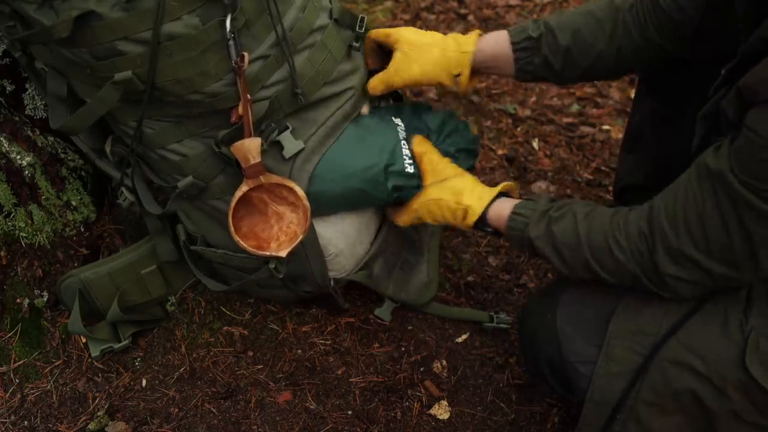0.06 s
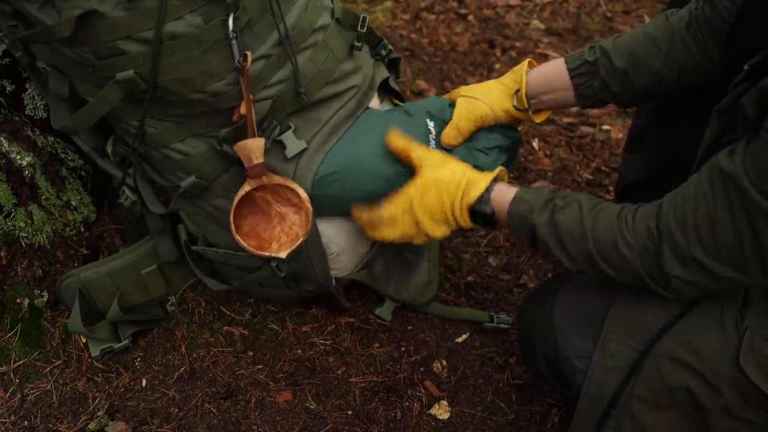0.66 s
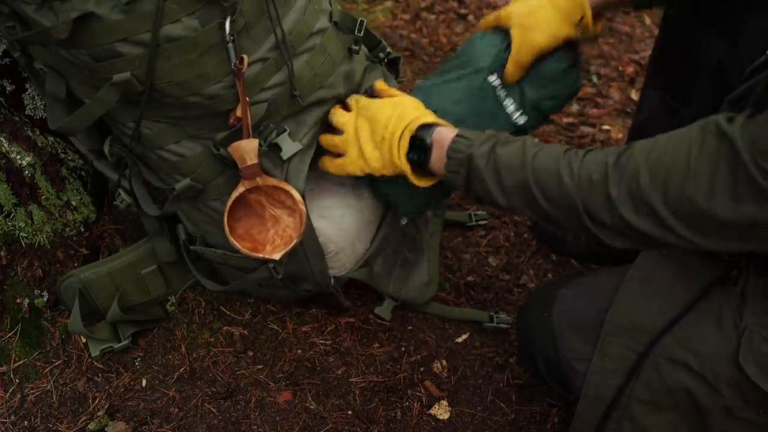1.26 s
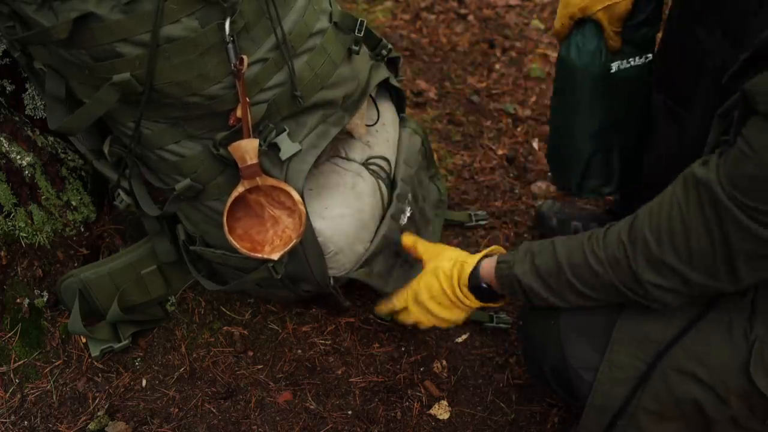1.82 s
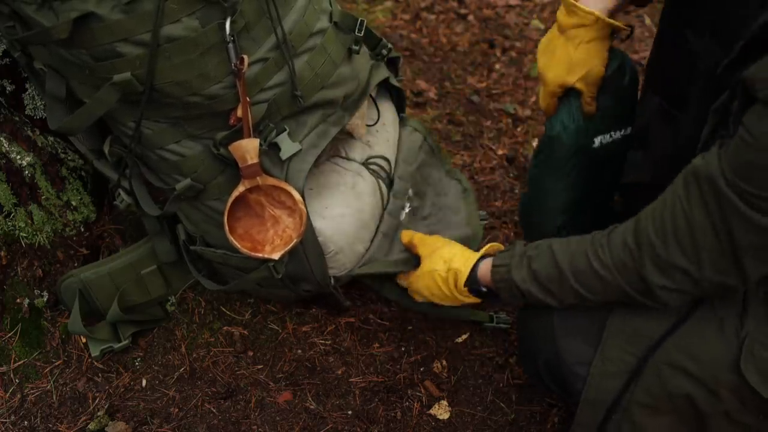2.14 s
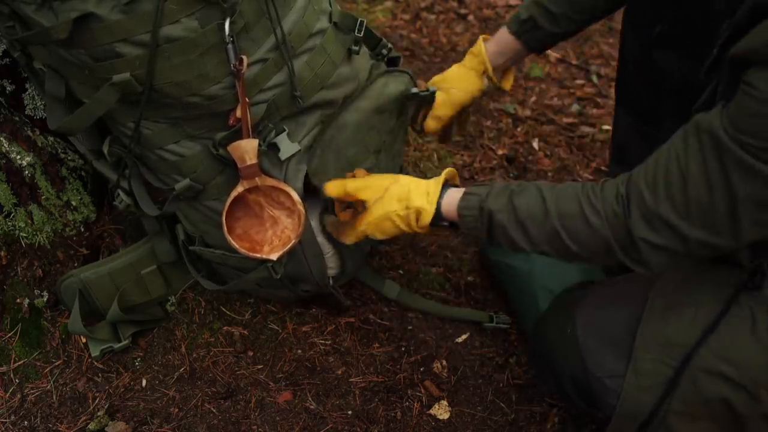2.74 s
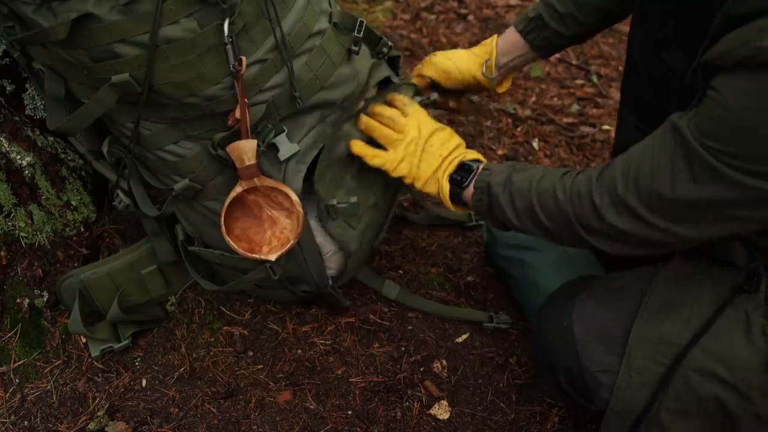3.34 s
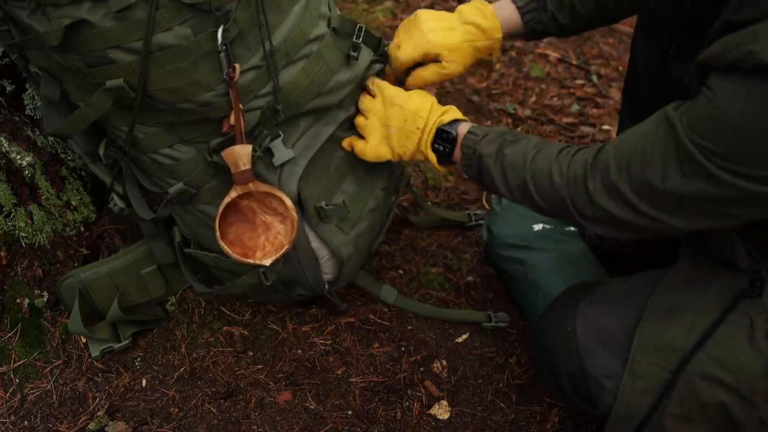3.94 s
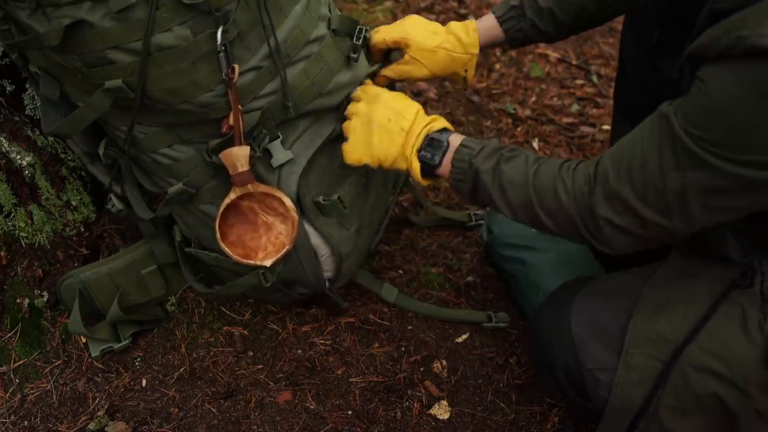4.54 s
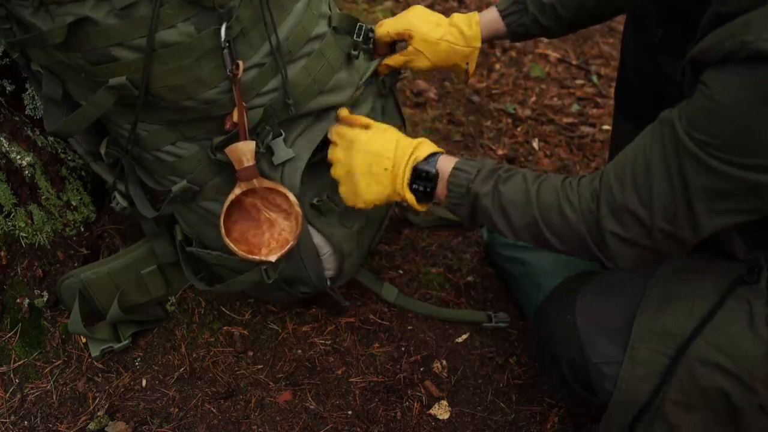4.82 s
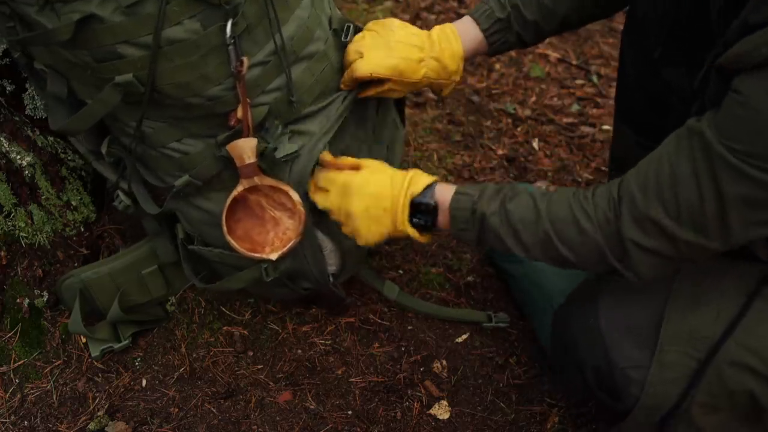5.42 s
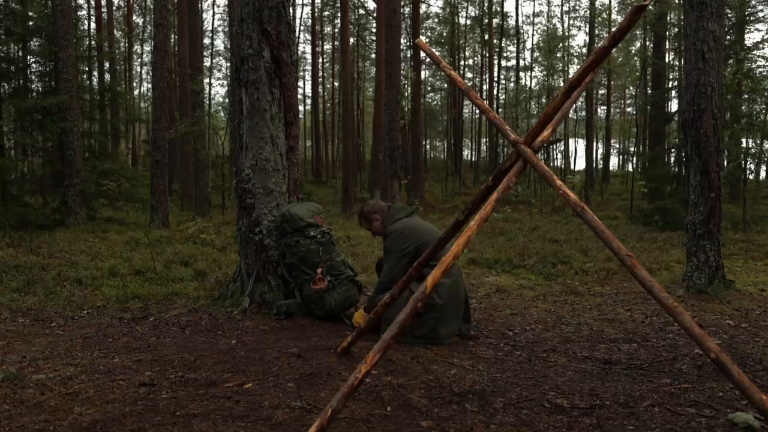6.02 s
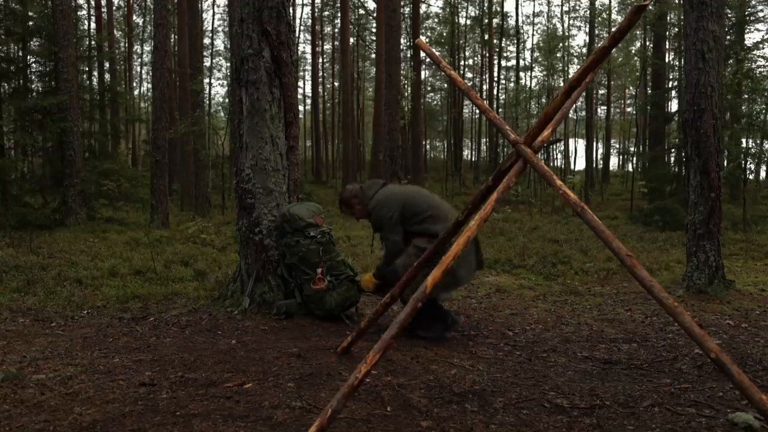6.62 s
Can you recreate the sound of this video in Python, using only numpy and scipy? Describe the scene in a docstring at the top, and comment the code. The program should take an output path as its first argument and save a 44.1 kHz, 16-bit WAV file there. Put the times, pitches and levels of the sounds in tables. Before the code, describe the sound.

Close nylon rustling and a soft thud, followed by a backpack zip ticking and buzzing in short pulls in a quiet forest.

```python
"""On a quiet forest floor, a nylon stuff sack rustles against a backpack and is dropped beside it.
Sliding cloth gives friction noise, folds snap over, and a glove squeaks by stick and slip.
Gloved hands fold the flap over and draw it shut in jerks: the fastener, most likely a coarse zip,
ticks tooth by tooth, then buzzes as it speeds up, and every tooth thumps the taut fabric."""
import sys
import numpy as np
from scipy import signal
from scipy.fft import rfft, irfft, next_fast_len
from scipy.io import wavfile
from scipy.ndimage import uniform_filter1d

SR = 44100
rng = np.random.default_rng(int(sys.argv[2]) if len(sys.argv) > 2 else 0)


def transcribe(signal):
    """Save signal, clipped to [-1, 1], as a 16-bit WAV file at the path in sys.argv[1]."""
    frames = np.atleast_2d(signal).T
    limited = np.clip(frames, -1, 1)
    pcm = np.round(limited * 32767).astype(np.int16)
    wavfile.write(sys.argv[1], SR, pcm)


N = 293511
T = np.arange(N) / SR

# Noise spectra. Each row: frequency in Hz, relative spectral density in dB.
FOREST_SPECTRUM = [(15, -19), (25, 10), (156, -6), (260, -1.5), (340, -6), (848, -6), (1240, -14),
                   (2920, -16), (3720, -21), (15500, -21)]
CLOTH_SPECTRUM = [(29, -43), (50, -4.5), (122, 2.5), (183, 3.5), (221, 4.5), (375, 2), (753, 0),
                  (1660, -9.5), (3030, -14), (3670, -21.5), (4670, -21), (6230, -27), (8710, -25.5),
                  (12800, -27.5), (15500, -29)]
CRUMPLE_SPECTRUM = [(24, -34), (40, -27), (263, 3), (359, -5), (479, 2), (816, -8), (1520, -6.5),
                    (2260, -18), (2950, -22), (4210, -31), (8000, -33), (10400, -48), (17600, -120)]   # the sack landing
TAPE_SPECTRUM = [(2060, -29), (3500, 0), (3680, -27), (4040, -10), (5650, 4), (6250, -7), (9130, -5.5),
                 (15500, -6.5)]   # zip tape running through the slider
# Stereo width of the forest. Each row: frequency in Hz, side relative to mid in dB.
FOREST_WIDTH = [(60, -10), (110, -1), (200, -6.5), (380, -3), (700, -8), (1290, -8.5), (2380, -9),
                (4400, -6), (8120, -7), (15000, -3)]

# Resonances. Each row: frequency in Hz, bandwidth in Hz, relative gain in dB.
LOAD_MODES = [(83, 57, -9)]   # the packed contents
SEAM_MODES = [(402, 140, 8), (611, 105, 11), (779, 79, 7), (1036, 50, 3.5)]
SLIDER_MODES = [(1390, 580, 5), (1866, 830, 2.5), (2840, 360, -4), (4350, 980, -14), (5350, 370, -10.5),
                (8630, 1850, -17.5)]
FLAP_EDGE_MODES = [(970, 200, 3.4)]
PULL_TAB_MODES = [(2510, 530, 1.7)]
SQUEAK_MODES = [(603, 98, -1), (930, 120, -3.5)]
THUD_MODES = [(87, 62, -4.5), (250, 140, -9), (480, 140, -8.5)]

# Cloth sliding on cloth, first the sack, then flap and sleeves. Each row: start in seconds,
# length in seconds, level in dB, swell from start to end in dB, brightness in dB.
STROKES = [(-0.02, .19, -44, 1, 1), (0.196, .06, -48.5, 4, -1), (0.256, 0.051, -37.5, 2, -2.5),
           (0.342, .12, -40.5, 2, -2), (0.501, 0.27, -42.5, 4, 0.5), (0.804, 0.15, -45.5, 5, 0.5),
           (0.963, 0.11, -45.5, 5, -1), (1.055, 0.1, -43.5, -3, 4), (1.162, .128, -44.5, 5, 5.5),
           (1.317, 0.29, -52, -2, 2.5), (1.737, 0.4, -55, 1, 0), (1.997, 0.33, -51.5, -1, 4.5),
           (2.318, 0.23, -44.5, 9.5, 5.5), (2.561, 0.15, -48, -2.5, 2), (2.71, 0.27, -55, -1, -2),
           (3.642, 0.25, -48, -5.5, -1), (3.96, 0.17, -54.5, -5, 0.5), (4.134, .06, -45, -3, -4),
           (4.252, 0.1, -48.5, 0.5, -1.5), (5.006, 0.088, -45.5, -4, 0.5), (5.16, 0.19, -44.5, -6, -3),
           (5.787, 0.18, -48.5, -2.5, -3), (6.099, 0.25, -52.5, -4, -27)]
# Folds snapping and gloves patting, and at 5.85 s the zip's last tooth snapping home. Each row: start in
# seconds, relative thump and click levels in dB.
FOLDS = [(0.083, -38, -36), (0.0935, -45, -26), (0.1666, -34.5, -26.5), (0.2925, -33, -25.5),
         (0.3155, -54, -26), (0.4458, -25.5, -20.5), (0.5388, -41, -30), (0.9374, -39, -32),
         (1.0744, -35.5, -30), (1.282, -38, -23), (1.5326, -49, -34), (2.1584, -31.5, -42),
         (2.3145, -42, -31.5), (2.345, -32.5, -50), (2.4396, -59, -17.5), (2.5022, -36, -29),
         (3.9822, -42, -55), (4.3094, -34.5, -36), (5.1792, -30.5, -23), (5.2827, -36, -53),
         (5.8524, -30, -21.5), (6.316, -41.5, -54), (6.3615, -42, -60)]
# A glove slipping on nylon. Each row: start in seconds, peak level in dB.
GLOVE_SLIPS = [(0.7955, -23.5), (0.8012, -19.5), (0.8042, -29)]
# Single teeth passing the slider.
# Each row: start in seconds, relative thump and click levels in dB, fabric pitch in Hz.
SINGLE_TEETH = [(3.259, -31.5, -33, 180), (3.2848, -30.5, -30.5, 194), (3.3027, -31, -27, 189),
                (3.3228, -27, -33, 177), (4.4221, -34, -30.5, 242), (4.461, -30, -28.5, 262),
                (4.4763, -28.5, -33, 257), (4.5004, -31.5, -25.5, 250), (4.5303, -30.5, -21, 290),
                (4.5442, -28, -18.5, 322), (4.7083, -28, -28, 213), (4.764, -32, -17.5, 230),
                (4.795, -31, -12, 234), (4.8463, -36, -24.5, 142), (4.9444, -33.5, -27, 240),
                (4.9616, -25, -19.5, 223), (5.4958, -27, -26, 182), (5.6086, -33, -25, 154),
                (5.6252, -26, -25, 151), (5.6906, -21, -20, 192), (5.7166, -21.5, -18.5, 191),
                (5.7334, -23, -23, 148), (5.7393, -17.5, -19, 222), (5.758, -36, -21, 180),
                (5.7714, -31, -23, 230), (5.7912, -35, -26, 183)]
# The first long draw of the slider. Each row: time in seconds, teeth per second, roughness from 0 to 1,
# hand force in dB, fabric tension in dB, bite of the hard parts in dB.
LONG_DRAW = [(3.341, 79, .25, -27.5, 1, -10), (3.40, 125, .3, -31, 5, -6),
             (3.452, 215, 0.26, -30, 3.5, -10), (3.48, 237, 0.27, -32.5, 3, -8.5),
             (3.497, 300, 0.01, -33.5, 3, -4), (3.517, 212, 0.05, -31, 1.5, -8),
             (3.55, 222, .05, -28, -0.5, -11), (3.587, 278, .05, -32, 3, -1.5),
             (3.626, 170, .12, -35.5, 7, -0.5), (3.675, 145, .5, -35, 1.5, -1.5),
             (3.711, 88, 0.53, -47, 13, -7)]
# The opposite teeth strike halfway between, strongly near the end of the draw.
# Each row: time in seconds, strength from 0 to 1.
OPPOSITE_ROW = [(3.57, .05), (3.595, 0.96), (3.625, 0.73), (3.71, 0.05)]
# Short jerks. Each row: start, rise, steady and fall times in seconds, nominal top speed in teeth
# per second, roughness from 0 to 1, then force, tension, tightening and bite in dB.
JERKS = [(4.55, 0.042, 0.037, 0.055, 245, 0.3, -31.5, 7, -1, -1),
         (4.723, 0.042, .025, 0.047, 239, 0.3, -35.5, 9.5, -5.5, 4),
         (5.362, .031, .038, .043, 497, 0.11, -32.5, 9.5, 11, 0),
         (5.521, .022, .02, 0.037, 210, .08, -34, 14, -5, 1.5),
         (5.635, 0.016, 0.016, 0.016, 153, 0.25, -32, 15.5, 5, 3)]

CRINKLE_DB, SWISH_DB = -6, -13.5   # against the body of the rustle
SLAP_HARDNESS = 0.55   # 0: the seam's slap follows the thump of a contact, 1: its click
CRUISE_PER_S = 236   # reference speed of the zip, in teeth per second


def from_db(db):
    """Decibels to amplitude ratio."""
    return 10 ** (np.asarray(db) / 20)


def rms_one(x):
    """Normalise to unit rms."""
    return x / np.sqrt(np.mean(x ** 2) + 1e-20)


def in_time(rows):
    """Linear interpolation of each column at every sample."""
    times, *columns = np.transpose(rows)
    return [np.interp(T, times, column) for column in columns]


def cut(x, hz, kind, order=2):
    """Butterworth filter."""
    return signal.sosfilt(signal.butter(order, hz, kind, fs=SR, output="sos"), x + 1e-18)


def colour(x, spectrum):
    """Spectral shaping by a curve interpolated in log frequency."""
    size = next_fast_len(N)
    bins_hz = np.arange(size // 2 + 1) * SR / size
    hz, db = np.transpose(spectrum)
    gain = from_db(np.interp(np.log(np.maximum(bins_hz, 1)), np.log(hz), db))
    return irfft(rfft(x, size) * gain, size)[:N]


def drift(rate_hz):
    """Low-passed noise: a slow random fluctuation of unit rms."""
    step, settling = 40, 2000
    pole = np.exp(-2 * np.pi * step * rate_hz / SR)
    noise = rng.standard_normal(N // step + settling + 2)
    slow = signal.lfilter([1], [1, -2 * pole, pole * pole], noise)[settling:]
    return np.interp(np.arange(N) / step, np.arange(len(slow)), rms_one(slow))


def resonate(x, modes):
    """Superposition of damped modes of alternating sign."""
    out = 0
    for k, (hz, width_hz, db) in enumerate(modes):
        r = np.exp(-np.pi * width_hz / SR)
        feedback = [1, -2 * r * np.cos(2 * np.pi * hz / SR), r * r]
        ring = signal.lfilter([(1 - r * r) / 2, 0, (r * r - 1) / 2], feedback, x + 1e-18)
        out = out + (-1) ** k * from_db(db) * ring
    return out


def grains(per_s, spread_db):
    """Shot noise: impulses at random times, unit rms."""
    sizes = from_db(spread_db * np.minimum(rng.exponential(1, N), 4)) * rng.choice([-1, 1], N)
    return rms_one(sizes * (rng.random(N) < per_s / SR))


def strike(body, start_s, peak_db, scuff, scuff_s):
    """Impact excitation: an impulse and a short scuff of noise set a body ringing."""
    t = T[:4096]
    push = scuff * rng.standard_normal(len(t)) * np.exp(-t / scuff_s) + (t == 0)
    blow = body(push)
    return int(start_s * SR), from_db(peak_db) * blow / np.abs(blow).max()


def place(blows):
    """Superposition of blows, each a start sample and a wave."""
    out = np.zeros(N)
    for start, wave in blows:
        out[start:start + len(wave)] += wave[:N - start]
    return out


def forest(mid_db):
    """Air in the trees is steady broadband noise; an uncorrelated side signal gives it width."""
    mid, side = [rms_one(colour(rng.standard_normal(N), FOREST_SPECTRUM)) for _ in range(2)]
    return from_db(mid_db) * (mid + colour(side, FOREST_WIDTH) * np.array([[1], [-1]]))


def stroke_levels(attack_s, release_s, sleeves_db):
    """Incoherent sources add in power: the cloth's body, crinkle and swish, in dB, over all strokes."""
    body = crinkle = swish = from_db(sleeves_db) ** 2   # the arms never quite rest
    for start_s, length_s, db, swell_db, bright_db in STROKES:
        age = T - start_s
        shape = np.clip(age / attack_s, 0, 1) * np.exp(-np.clip((age - length_s) / release_s, 0, 20))
        progress = np.clip(age / length_s, 0, 1)
        power = (shape * from_db(db + swell_db * (progress - .5))) ** 2
        body = body + power
        crinkle = crinkle + power * from_db(bright_db) ** 2
        swish = swish + power * from_db(1.18 * bright_db) ** 2
    return 10 * np.log10(body), 10 * np.log10(crinkle) + CRINKLE_DB, 10 * np.log10(swish) + SWISH_DB


def rustle(levels_db, flicker_db, clump_db, grain_share):
    """Sliding friction: noise and crease grains, in clumps that differ from band to band."""
    clumps, out = drift(45), 0
    zones_hz = [[60, 250, 500, 1000], [1000, 2000, 4000], [4000, 8000, 16000]]
    for level_db, edges, unevenness in zip(levels_db, zones_hz, [1.0, .9, .4]):
        zone = 0
        for low, high in zip(edges, edges[1:]):
            rub = np.sqrt(1 - grain_share) * rng.standard_normal(N)
            rub += np.sqrt(grain_share) * grains(per_s=2500, spread_db=0.5)
            patches = from_db(unevenness * (flicker_db * drift(14.4) + clump_db * clumps))
            zone = zone + cut(colour(rub, CLOTH_SPECTRUM), [low, high], "band", order=3) * patches
        out = out + from_db(level_db) * rms_one(zone)
    return out


def creases(crinkle_db, per_s, relative_db):
    """Sparse shot noise: single creases pop out of the rustle."""
    pops = cut(colour(grains(per_s, spread_db=2), CLOTH_SPECTRUM), 900, "high")
    return from_db(crinkle_db + relative_db) * rms_one(pops)


def panel(x, pitch_hz):
    """Membrane resonance: tauter fabric rings higher, and the load behind it booms lower."""
    fabric_mode = (pitch_hz, 51, 0)
    ring = resonate(x, LOAD_MODES + [fabric_mode])
    return cut(cut(ring, 1.6 * pitch_hz, "low", order=3), 64, "high")


def seam(x):
    """Damped midrange modes give the stiff seam a short, hollow slap."""
    return cut(resonate(x, SEAM_MODES), [300, 1250], "band")


def slider(x):
    """Small hard parts have high, fast-decaying modes, heard as a click."""
    return cut(resonate(x, SLIDER_MODES), 650, "high")


def folds(pitch_hz):
    """Soft impacts of folds, gloves and the zip's last tooth excite panel, seam and slider together."""
    blows = []
    for s, thump_db, click_db in FOLDS:
        slap_db = thump_db + SLAP_HARDNESS * (click_db - thump_db)
        blows += [strike(lambda x: panel(x, pitch_hz), s, thump_db + 0.5, scuff=0.036, scuff_s=0.0023),
                  strike(seam, s, slap_db + 1.5, scuff=0.18, scuff_s=0.0027),
                  strike(slider, s, click_db - 5, scuff=0.8, scuff_s=0.0011)]
    return place(blows)


def glove_squeak():
    """Stick-slip friction: each slip of the glove on the nylon rings two resonances."""
    def ring(x):
        return cut(resonate(x, SQUEAK_MODES), [500, 1100], "band")
    return place(strike(ring, s, db, scuff=.01, scuff_s=0.002) for s, db in GLOVE_SLIPS)


def sack_drop(start_s, crumple_db, rise_s, decay_s, thud_db):
    """Inelastic impact: the soft sack thuds in its low modes and crumples."""
    age = np.maximum(T - start_s, 0)
    envelope = (1 - np.exp(-age / rise_s)) * np.exp(-age / decay_s)
    crumple = rms_one(colour(grains(per_s=6400, spread_db=0), CRUMPLE_SPECTRUM)) * envelope
    thud = strike(lambda x: resonate(x, THUD_MODES), start_s, thud_db, scuff=0.015, scuff_s=0.0047)
    return from_db(crumple_db) * crumple + cut(place([thud]), 610, "low")


def zip_ticks(scuff, scuff_s):
    """At a crawl the ear resolves each tooth's impact: a click, and the fabric springing back."""
    def soft_click(x):
        return cut(slider(x), 5000, "low", order=1)
    blows = []
    for s, thump_db, click_db, pitch_hz in SINGLE_TEETH:
        slap_db = thump_db + SLAP_HARDNESS * (click_db - thump_db)
        blows += [strike(lambda x: panel(x, pitch_hz), s, thump_db + 4, scuff, scuff_s),
                  strike(seam, s, slap_db - 3, scuff, scuff_s),
                  strike(soft_click, s, click_db - 7.5, scuff, scuff_s)]
    return place(blows)


def jerk(start_s, rise_s, steady_s, fall_s, top_per_s, rough, force_db, tension_db, tighten_db, bite_db):
    """The slider accelerates, runs and slows as the fabric tightens or gives; rows as in LONG_DRAW."""
    crawl_per_s, sag = 115, .04
    ages = np.cumsum([0, rise_s, steady_s, fall_s])
    slow = (crawl_per_s, rough + .12)
    fresh, tiring = (top_per_s * (1 + sag), rough), (top_per_s * (1 - sag), rough)
    return [(start_s + age, *motion, force_db, tension_db + tighten_db * (age / ages[-1] - .5), bite_db)
            for age, motion in zip(ages, [slow, fresh, tiring, slow])]


def tooth_impulses(per_s, moving):
    """Travel is the integral of speed: one impulse as a pull sets off, then one per tooth length."""
    sets_off = np.diff(moving, prepend=0) > 0
    travel = np.cumsum(per_s * moving) / SR
    travel = travel - np.maximum.accumulate(travel * sets_off)
    near_row, far_row = [np.diff(np.floor(travel + offset), prepend=0) > 0 for offset in (0, .5)]
    return 1. * sets_off + near_row + in_time(OPPOSITE_ROW)[0] * far_row


def zip_levels(per_s, force_db, tension_db, bite_db):
    """Excitation grows with force and octaves of speed: thump, slap, click and hiss levels in dB."""
    fabric_limit_hz = 238   # the fabric cannot follow faster teeth
    octaves = np.log2(per_s / CRUISE_PER_S)
    too_fast = np.maximum(np.log2(per_s / fabric_limit_hz), 0)
    return [force_db + tension_db + 8.5 * octaves - 28 * too_fast,
            force_db + 7 * octaves,
            force_db + bite_db - 11 + 4.5 * octaves,
            force_db + bite_db - 19 + 6.5 * octaves]


def drive(parts, levels_db, moving):
    """Forced, then free vibration: parts follow their levels during a pull and ring out after it."""
    last_moving = np.maximum.accumulate(np.arange(N) * (moving > 0))
    duty = uniform_filter1d(moving, size=800) + 1e-6
    out = 0
    for part, level_db in zip(parts, levels_db):
        power = uniform_filter1d(part ** 2 * moving, size=800) / duty
        gain = from_db(level_db) / np.sqrt(np.abs(power) + 1e-10)
        out = out + part * gain[last_moving]
    return out


def zip_buzz(jitter, unevenness_db, stutter_db, scuff, scuff_s, hiss_share):
    """A fast impulse train fuses into a buzz whose pitch is the rate of teeth passing the slider."""
    runs = [LONG_DRAW] + [jerk(*row) for row in JERKS]
    motion = [(s, np.log(speed), *rest) for run in runs for s, speed, *rest in run]
    log_speed, rough, force_db, tension_db, bite_db = in_time(motion)
    per_s = np.exp(log_speed + jitter * rough * drift(120))
    moving = np.zeros(N)
    for run in runs:
        moving[int(run[0][0] * SR):int(run[-1][0] * SR)] = 1
    teeth = tooth_impulses(per_s, moving) * from_db(unevenness_db * rough * rng.standard_normal(N))
    # each tooth scrapes briefly along the slider; above cruising speed it skims and scrapes less
    contact = signal.lfilter([1], [1, -np.exp(-1 / (scuff_s * SR))], teeth + 1e-18)
    skim = from_db(-20 * np.maximum(np.log2(per_s / CRUISE_PER_S), 0))
    scrape = skim * contact * rng.standard_normal(N)
    knock = teeth + 0.82 * scrape
    push = teeth + scuff * rough * scrape
    loose = from_db(1.5 - 0.64 * tension_db)   # tab and flap edge rattle less under tension
    thump = panel(teeth, pitch_hz=210) + 0.27 * panel(teeth, pitch_hz=250)
    slap = cut(seam(push), 1120, "low")
    slap += loose * cut(resonate(push, FLAP_EDGE_MODES), [760, 1200], "band")
    click = slider(knock) + loose * cut(resonate(knock, PULL_TAB_MODES), [1900, 3400], "band")
    tape = colour(rng.standard_normal(N), TAPE_SPECTRUM)
    hiss = cut(tape * (contact + hiss_share) * moving, 8000, "high")
    force_db = force_db + stutter_db * drift(75)   # the hand's pull is never even
    levels_db = zip_levels(np.exp(log_speed), force_db, tension_db, bite_db)
    return drive([thump, slap, click, hiss], levels_db, moving)


def scene():
    """Superposition: the handling is close and dead centre, with the forest spread around it."""
    body_db, crinkle_db, swish_db = stroke_levels(attack_s=0.013, release_s=0.034, sleeves_db=-55.5)
    cloth = rustle([body_db, crinkle_db, swish_db], flicker_db=2.5, clump_db=0.5, grain_share=0.55)
    cloth += creases(crinkle_db, per_s=80, relative_db=-6.5)
    knocks = folds(pitch_hz=279) + glove_squeak()
    knocks += sack_drop(start_s=2.523, crumple_db=-17.5, rise_s=0.023, decay_s=0.023, thud_db=-14)
    ticks = zip_ticks(scuff=0.053, scuff_s=0.0061)
    buzz = zip_buzz(jitter=0.15, unevenness_db=12.5, stutter_db=1.5,
                    scuff=0.5, scuff_s=0.0061, hiss_share=0.22)
    return forest(mid_db=-56) + cloth + knocks + ticks + buzz


def record(dry):
    """Band limiting: the deepest rumble is rolled off and the top is cut steeply."""
    steep_lowpass = signal.ellip(12, .1, 80, 15900, fs=SR, output="sos")
    return signal.sosfilt(steep_lowpass, cut(dry, 40.6, "high"))


dry = scene()
out = record(dry)
transcribe(out)
```